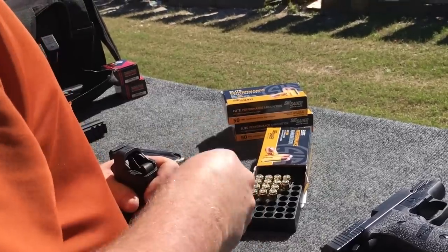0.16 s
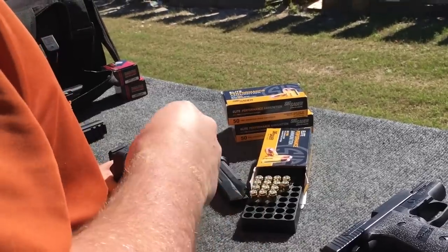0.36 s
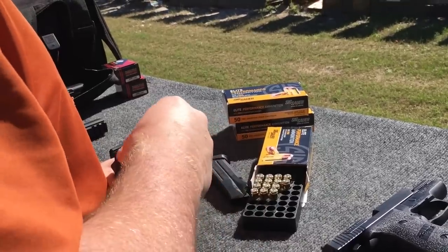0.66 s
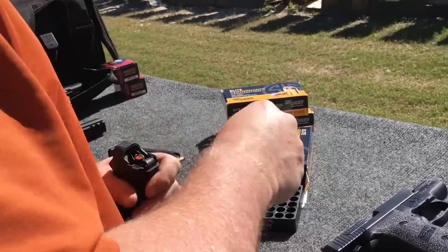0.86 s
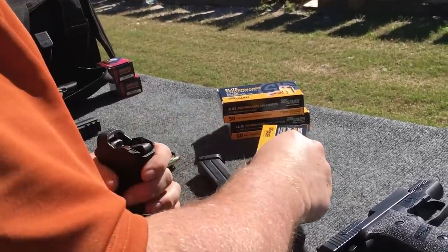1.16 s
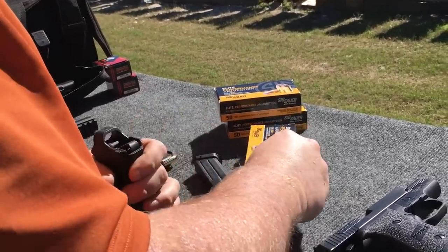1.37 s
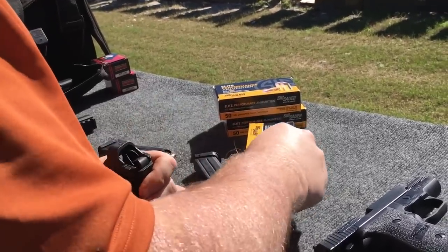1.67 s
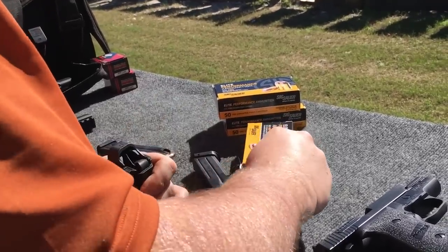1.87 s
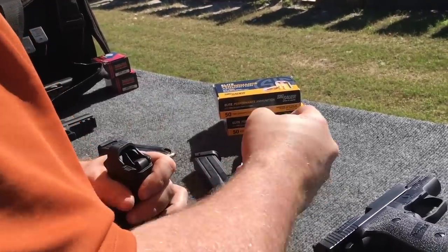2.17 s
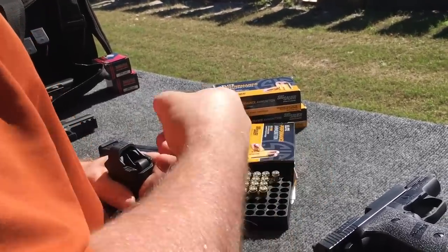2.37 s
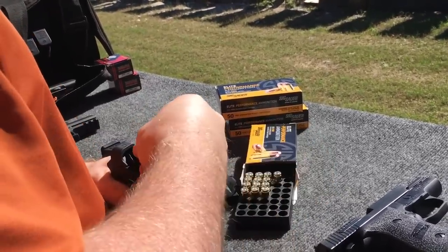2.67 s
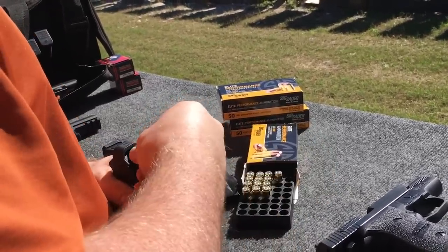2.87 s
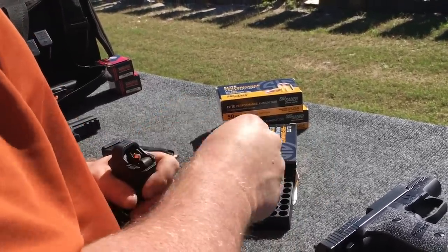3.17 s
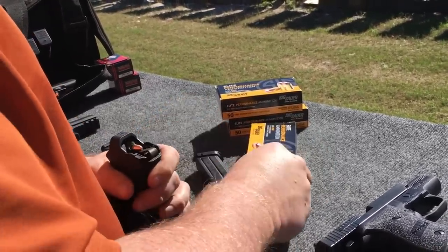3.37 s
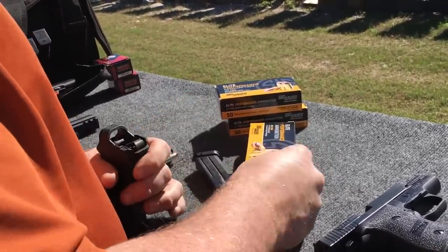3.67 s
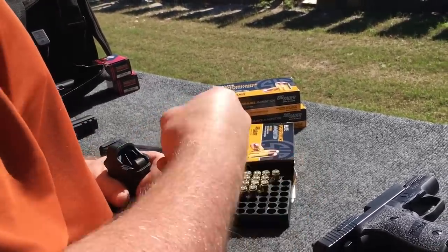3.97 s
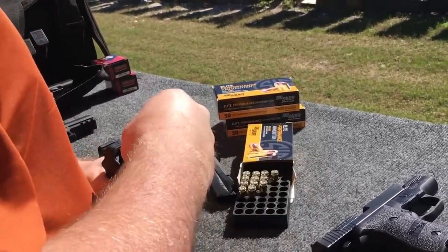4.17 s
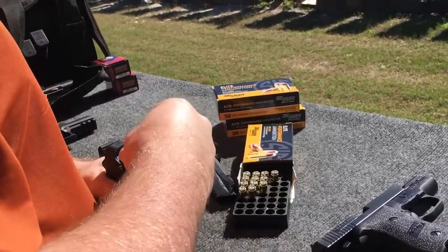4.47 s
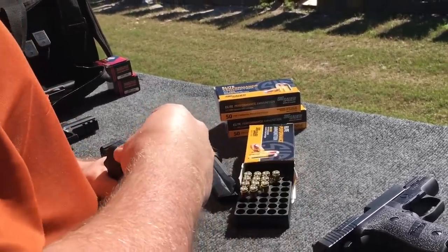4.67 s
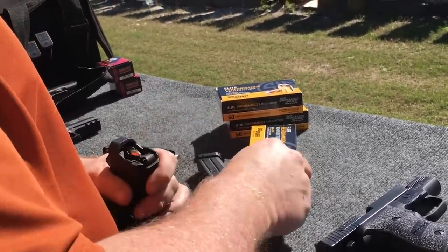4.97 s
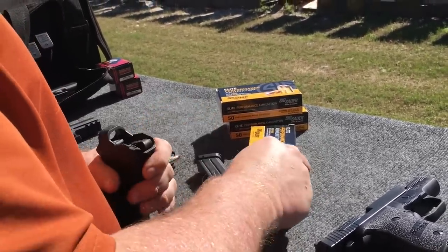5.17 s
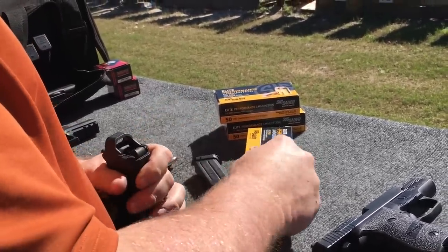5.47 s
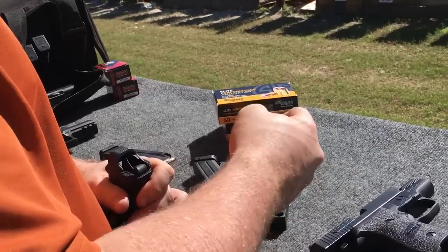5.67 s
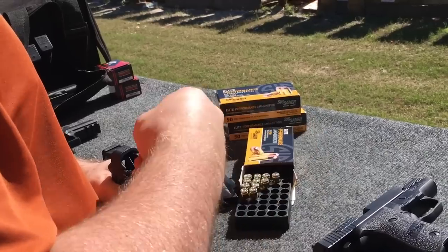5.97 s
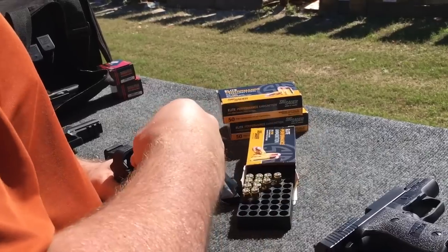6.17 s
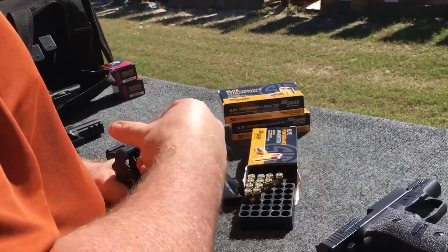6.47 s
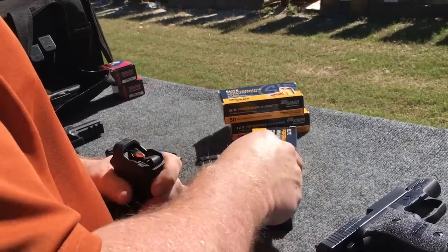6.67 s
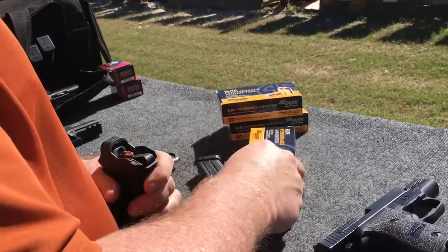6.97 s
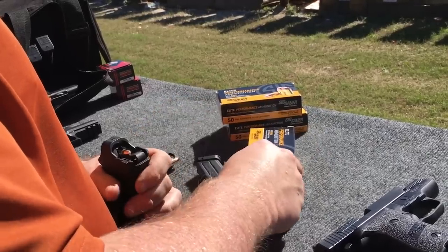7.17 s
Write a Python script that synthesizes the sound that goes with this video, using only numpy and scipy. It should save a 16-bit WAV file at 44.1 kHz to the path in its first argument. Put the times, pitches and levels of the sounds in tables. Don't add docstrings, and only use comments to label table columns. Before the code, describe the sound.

Small brass cartridges click and snap one by one into a pistol magazine through a plastic loader, close up, with wind rumbling on the microphone.

```python
import sys
import numpy as np
from scipy import signal
from scipy.io import wavfile
from scipy.ndimage import uniform_filter1d

SR = 44100
rng = np.random.default_rng(int(sys.argv[2]) if len(sys.argv) > 2 else 0)


def volts_from_decibels(level):
    exponent = np.asarray(level, float) / 20
    return 10 ** exponent


def store_pcm(level_fs):
    pcm = np.round(np.clip(level_fs, -1, 1) * 32767).astype(np.int16)
    wavfile.write(sys.argv[1], SR, np.atleast_2d(pcm).T)


N = 322812

# start in seconds [s], peak level [dB],
# bright steel against the rest [dB], pitch of the struck part [Hz].
HOLLOW_HITS = [
    (0.7679, -33.5, 5, 3670),
    (4.3608, -47.5, -8, 4150),
    (4.8469, -45, -7, 3380),
    (6.5306, -38, 11, 3700),
    (7.2905, -59, -3, 3040),
]
# start [s], peak level [dB], bright steel [dB], struck part [Hz].
STEEL_HITS = [(0.605, -33.5, 6, 4200), (0.993, -42.5, -12, 3970), (1.007, -41.5, -14, 2630),
              (1.0123, -47, 4, 8890), (1.106, -48, -38, 2540), (2.8197, -38.5, 0, 5500),
              (2.9323, -43.5, -25, 6170), (3.4829, -34.5, 10.5, 7950), (3.7997, -39, -2, 7040),
              (4.4705, -46.5, 6, 3150), (4.9704, -45, 9.5, 3930), (5.0224, -37, 5, 4560),
              (5.1056, -29, -7.5, 7500), (5.11, -51, -13, 9200), (5.391, -39, 2.5, 8750),
              (6.2398, -41, 4, 1930), (6.3148, -34.5, 12, 6260), (6.3211, -43, 16.5, 3800),
              (6.7074, -41, -0.5, 9200), (6.7167, -43.5, -4.5, 3850), (3.1439, -36, -6, 4100),
              (4.8537, -43.5, 0, 3260), (4.8595, -50, 1, 4100), (0.7817, -53, -18, 3920),
              (0.794, -48, -22, 2600), (6.5347, -47, -13, 3040), (6.8452, -40, 8.5, 7500),
              (7.2869, -34.5, -22, 4070)]
# start [s], peak level [dB], bright steel [dB], struck part [Hz].
LOADER_HITS = [(1.0274, -33.5, 17, 7700), (1.4567, -43.5, 7, 7900), (1.6835, -39, -22, 1440),
               (1.689, -44, -22, 2300), (2.1007, -50.5, -27, 1470), (2.104, -61, -30, 790),
               (2.7452, -38.5, -3, 6200), (3.082, -45, -6, 6240), (3.4302, -48, -10, 2580),
               (3.4358, -27, 6, 7800), (3.4408, -35.5, -16, 6800), (3.5187, -44, 3, 7500),
               (3.8636, -37.5, -9, 4150), (4.3542, -40.5, -14, 4160), (4.6194, -45.5, -15, 5240),
               (5.0365, -40, 6, 4800), (5.04, -26, 4.5, 7850), (5.152, -41, -5, 9000),
               (5.6753, -47.5, 9.5, 4960), (6.7445, -21.5, 7.5, 6160), (6.752, -31, -2, 9300),
               (6.8293, -40, 4, 8800)]
# plastic knock [dB], hollow tube [dB].
HOLLOW_RINGS = (-40, 8.7)
STEEL_RINGS = (-31, -12.5)
LOADER_RINGS = (-8.5, -24)
# start [s], peak level [dB], struck part [Hz], bright steel [dB].
BRASS_TICKS = [(0.659, -42.5, 3330, 10.5), (0.6988, -43.5, 5440, 6), (0.723, -47, 3430, 2),
               (0.7455, -52, 5300, 6), (0.76, -38, 5300, -9), (0.9705, -63, 5000, 0), (0.989, -51, 3840, 3),
               (1.0193, -44, 5500, 0), (1.0685, -57, 7500, 1), (1.0785, -57, 8800, 3),
               (1.482, -56, 7350, -6), (3.0896, -46.5, 6060, 7), (3.394, -46, 3730, 9),
               (3.4055, -42, 4030, 5), (3.4179, -44, 4500, 5), (3.514, -49, 7220, 8),
               (3.8174, -54, 3270, 4), (3.8886, -48.5, 9000, 7), (3.924, -49, 5500, 15),
               (4.704, -49, 5750, 13.5), (4.8065, -55, 5800, 1), (4.9663, -49, 3600, 14),
               (4.99, -53, 3800, 3), (5.005, -42.5, 4770, 6), (5.143, -42, 4920, 10),
               (5.5552, -46.5, 3530, 12.5), (5.6143, -56, 7800, -2), (5.68, -48, 5000, 3),
               (5.7194, -56, 6000, 1), (6.3554, -57, 8900, 5), (6.38, -49.5, 3920, 4),
               (6.5002, -46.5, 3890, 14), (6.5128, -40.5, 3890, -3), (6.521, -46, 2300, 3),
               (6.5446, -40.5, 3780, 3), (6.555, -52, 8500, 5), (6.7331, -45, 9500, 8),
               (6.7854, -46, 5480, 7), (6.797, -44.5, 6000, 4)]
# start [s], peak level [dB], struck part [Hz], bright steel [dB].
PLASTIC_TICKS = [(0.8067, -46, 3640, -12), (1.222, -59.5, 4440, -26), (1.259, -56, 4000, -23),
                 (1.2988, -47, 2400, -9), (1.3738, -45, 2400, -12), (1.404, -40.5, 2380, -10),
                 (1.4994, -48, 2300, -32), (1.567, -51.5, 2290, -38), (1.6176, -55, 5030, -12),
                 (1.725, -42, 2650, -12), (1.792, -50.5, 5600, -33), (2.046, -55, 3500, -27),
                 (2.0846, -51, 2600, -38), (2.9743, -43, 5540, -13), (3.042, -56, 5200, -18),
                 (3.1527, -41.5, 3900, -15), (3.325, -63, 3800, -17), (3.377, -51, 4300, -21),
                 (3.5, -44, 2510, -21), (3.6431, -54, 2360, -16), (3.742, -48.5, 2320, -21),
                 (3.9592, -49, 4480, -16), (4.363, -44, 3550, -19), (4.492, -60, 2600, -14),
                 (4.5715, -60, 3700, -18), (4.589, -60, 3700, -25), (4.7243, -45, 2730, -4),
                 (4.7635, -57, 2610, -14), (4.7756, -57, 3500, -14), (4.867, -42.5, 3680, -1),
                 (5.212, -46, 2420, -6), (5.2536, -47.5, 2250, 0), (5.315, -68, 2200, -14),
                 (5.5822, -43, 3240, -30), (5.643, -48, 2260, -8), (5.6667, -40, 2620, -28),
                 (5.747, -55, 2350, -16), (6.289, -42, 2120, -20), (6.297, -51, 5100, -10),
                 (6.461, -58, 5300, -20), (7.024, -52, 2370, -15)]
# start [s], peak level [dB], struck part [Hz].
SLIPS = [
    (0.7055, -54, 5300),
    (0.7185, -61, 9500),
    (0.732, -64, 8800),
    (3.4025, -50, 3900),
    (3.427, -52, 4000),
    (3.431, -44, 12300),
    (3.521, -53, 5000),
    (5.017, -54, 4200),
    (6.738, -44, 8500),
    (6.741, -37, 9000),
]
# start [s], peak level [dB], pitch [Hz], time to fall 60 dB [s].
OVERTONES = [(0.606, -47, 8600, 0.013), (0.768, -41, 3330, 0.054), (0.769, -42, 9900, 0.018),
             (0.989, -50, 5500, .012), (0.989, -52, 3800, .025), (1.007, -41, 4300, .012),
             (1.028, -35, 3950, 0.017), (1.027, -36, 2400, 0.026), (1.0274, -45, 11200, .01),
             (1.1065, -46, 4860, 0.011), (1.686, -41, 2050, .02), (2.071, -58, 2100, .02),
             (2.087, -51, 850, .03), (2.1007, -39.5, 940, 0.048), (2.114, -54, 950, .025),
             (3.4365, -36, 1110, 0.013), (3.4415, -40, 8600, .012), (3.4415, -48, 3800, .015),
             (4.362, -45, 1700, 0.028), (4.62, -49, 3500, 0.045), (4.624, -51.5, 2580, 0.037),
             (4.704, -62, 2600, .03), (4.858, -50, 2260, 0.043), (4.86, -48, 3350, 0.041),
             (5.04, -35, 1060, .015), (5.0405, -39, 10300, .01), (5.106, -54, 4330, 0.012),
             (6.246, -50, 2400, 0.034), (6.288, -55, 3700, 0.062), (6.295, -59, 5150, .03),
             (6.5008, -48, 2330, 0.029), (6.535, -47, 3400, 0.076), (6.744, -29, 10000, 0.011),
             (6.7445, -33, 2060, .015), (6.744, -34.5, 8200, .01), (7.287, -36, 4470, 0.013),
             (7.2855, -38.5, 2600, 0.028), (7.2866, -39, 7140, .012)]
# pitch [Hz], width [Hz], level [dB].
STEEL_MODES = [(2520, 36, 11.5), (4105, 560, 16), (4800, 95, 0), (5860, 340, 15), (6500, 480, -3),
               (7330, 310, -1.5), (8800, 220, -1.5), (9820, 410, 2), (11640, 1800, -17.5),
               (13900, 500, -36)]
# pitch [Hz], width [Hz], level [dB].
PLASTIC_MODES = [(1210, 166, 3), (1730, 1230, -2.5), (1980, 210, -4)]
# pitch [Hz], width [Hz], level [dB].
TUBE_MODES = [(3520, 130, 0), (3390, 90, -3), (3750, 220, -5)]
# start [s], end [s], level [dB], singing part [Hz].
SCRAPES = [(0.174, 0.196, -78.5, 5000), (0.706, 0.777, -76, 5300), (1.263, 1.359, -72.5, 12300),
           (1.392, 1.44, -75, 5500), (1.445, 1.509, -65, 8400), (1.525, 1.63, -79, 5000),
           (1.679, 1.752, -69, 12100), (1.772, 1.827, -79, 5540), (1.844, 1.9, -78.5, 5500),
           (3.395, 3.443, -70, 3830), (3.582, 3.652, -77.5, 2380), (3.644, 3.713, -76.5, 9100),
           (3.727, 3.806, -75.5, 5640), (3.794, 3.917, -73, 6000), (3.936, 3.958, -69, 8900),
           (4.027, 4.045, -73, 8150), (5.18, 5.245, -80.5, 5000), (5.247, 5.306, -73.5, 8500),
           (5.32, 5.403, -75, 5530), (5.643, 5.705, -69.5, 11500), (5.659, 5.677, -63.5, 5000),
           (6.722, 6.746, -58.5, 4000), (7.253, 7.33, -71.5, 2600)]
# start [s], end [s], level [dB], singing part [Hz].
RUBS = [(0.617, 0.673, -78, 3500), (0.781, 0.803, -64.5, 3500), (0.992, 1.033, -61, 4800),
        (1.033, 1.092, -71.5, 4500), (2.056, 2.17, -84, 3470), (2.82, 2.865, -80, 5300),
        (2.982, 3.028, -87, 5200), (3.158, 3.197, -83, 3900), (3.441, 3.53, -72, 7000),
        (4.465, 4.507, -80, 5000), (4.615, 4.628, -70, 3100), (4.64, 4.687, -85, 5300),
        (4.88, 4.95, -86, 3600), (4.705, 4.775, -73, 3050), (4.803, 4.838, -78, 5800),
        (4.965, 5.16, -73.5, 4000), (5.543, 5.632, -86, 3500), (6.243, 6.3, -75.5, 3700),
        (6.327, 6.39, -74, 6000), (6.44, 6.49, -80, 3700), (6.508, 6.557, -69, 3500),
        (6.565, 6.6, -80, 3600), (6.762, 6.854, -70, 4200), (6.863, 7.001, -81.5, 2350)]
# frequency [Hz], density [dB per Hz].
RUB_SPECTRUM = [(900, -15), (1600, 11), (2400, 5.5), (4500, 7), (7000, -2.5), (12000, -13.5), (15500, -11)]
# time [s], level [dB].
BREEZE = [(0.0, -55), (0.96, -52.5), (1.1, -46), (2.18, -45), (2.36, -43), (2.93, -50.5), (3.55, -37.5),
          (4.03, -44.5), (4.5, -45.5), (4.78, -44), (4.93, -40.5), (5.18, -37), (5.44, -38.5),
          (5.75, -39.5), (6.12, -38), (6.4, -37.5), (6.91, -37), (7.32, -41)]
# frequency [Hz], density [dB per Hz].
BUFFET_SPECTRUM = [(18, -46.5), (30, -17), (49, -7), (80, 5.5), (149, -0.5), (210, -3), (330, -37.5),
                   (430, -43), (730, -120)]
# crest [s], peak level [dB], pitch [Hz].
EDDIES = [(0.533, -31.5, 111), (0.922, -24, 138), (1.305, -34, 78), (1.658, -30, 139), (2.225, -26.5, 104),
          (2.304, -27, 116), (2.915, -25.5, 132.5), (3.003, -26, 143), (3.237, -29, 111),
          (3.404, -25.5, 132), (3.464, -27, 138), (3.56, -21, 178), (3.678, -28.5, 147),
          (3.983, -23.5, 126), (4.059, -27.5, 174), (4.229, -27, 94), (4.391, -24.5, 141),
          (4.632, -28, 91.6), (5.105, -29.5, 175), (5.266, -24, 122), (5.348, -24, 164), (5.429, -28, 169),
          (5.766, -27.5, 133), (5.901, -25, 154), (6.104, -25, 122), (6.291, -27, 119), (6.809, -27.5, 164),
          (6.899, -26, 170), (6.935, -27.5, 120), (7.13, -27.5, 136),
          (0.298, -39, 116), (0.89, -39, 101), (0.989, -28.5, 111), (1.156, -37.5, 182),
                (1.375, -41, 105), (1.429, -36, 105), (1.726, -38, 129), (1.788, -38, 80), (1.898, -37, 80),
                (2.278, -27, 103), (2.331, -34, 186), (2.628, -32, 112), (2.8, -32, 82.5),
                (3.342, -41, 78.6), (3.731, -27, 139), (3.899, -31, 122), (4.112, -26, 109.3),
                (4.365, -38, 82.5), (4.91, -35.5, 98), (4.981, -27.5, 125), (5.134, -32.5, 111),
                (5.175, -36, 102), (5.586, -28.5, 140), (5.661, -29, 83), (5.79, -29, 195),
                (5.958, -30.5, 97), (6.496, -29.5, 129), (6.838, -27, 149), (2.042, -33.5, 100),
                (3.102, -24.5, 138), (3.154, -23.5, 119), (2.014, -39, 120), (4.371, -33, 147),
                (4.48, -31, 108), (4.891, -38.5, 120), (5.972, -28, 116.5), (7.011, -28, 152.6),
                (7.257, -24.5, 165)]
# start [s], pop peak [dB], eddy peak [dB], eddy pitch [Hz].
BREAKS = [(2.022, -46, -27.5, 260), (2.55, -42.5, -25, 168), (3.087, -30.5, -18.5, 187),
          (3.139, -47, -29.5, 150), (3.843, -72, -21, 193), (4.021, -40.5, -21, 135),
          (5.516, -41, -24, 210), (6.145, -46, -24.5, 209), (6.193, -47.5, -29, 134),
          (6.738, -48, -29.5, 110), (6.992, -56, -23.5, 174), (7.176, -42.5, -35.5, 149),
          (7.238, -44.5, -27, 177), (3.162, -40, -31, 140), (1.377, -54, -37.5, 201),
          (1.439, -62, -37, 212), (1.653, -46, -42, 200), (1.725, -55, -34, 210)]
# crest [s], peak level [dB], half width [s].
NIPS = [
    (2.0272, -32, 0.00036),
    (6.995, -38, 0.00057),
]
# frequency [Hz], density [dB per Hz].
ROAD_SPECTRUM = [(24, -33), (40, -2), (75, 6.5), (143, 3), (247, -27), (294, -15), (461, -23), (797, -12),
                 (1050, -22.5), (1330, -22), (1730, -43.5), (2270, -41.5), (11200, -54.5), (15500, -62.5)]


def clicks():
    s, peak_db, ring_hz, bright_db = columns(BRASS_TICKS + PLASTIC_TICKS)
    knock_db = -7.0 - 0.28 * bright_db
    out = contacts(s, peak_db - 6.0, knock_db, -11.0, bright_db, ring_hz, t60=0.085)
    kinds = (HOLLOW_HITS, HOLLOW_RINGS), (STEEL_HITS, STEEL_RINGS), (LOADER_HITS, LOADER_RINGS)
    for hits, (knock_db, tube_db) in kinds:
        s, peak_db, bright_db, ring_hz = columns(hits)
        out += contacts(s, peak_db, knock_db, tube_db, bright_db, ring_hz, t60=0.028)
    return out


def contacts(s, peak_db, knock_db, tube_db, bright_db, ring_hz, t60):
    t = np.arange(7000) / SR
    chatter = np.exp(-(t / 0.0013) ** 2)
    rattle = volts_from_decibels(-11.5 - 60 * t / t60)
    noise = rng.standard_normal((len(s), len(t)))
    grit = volts_from_decibels(17 * uniform_filter1d(rng.standard_normal(noise.shape), size=25, axis=1))
    dull = signal.lfilter([.6], [1, -.6], noise)
    attack = np.minimum(t / 0.00049, 1)
    hits = (noise * chatter + dull * rattle * grit) * attack
    lingering = hits + volts_from_decibels(-31 - 60 * t / 0.23) * dull

    crack = filtered(hits, 1, [2200, 9000], "band")
    steel = volts_from_decibels(-4) * body(hits, STEEL_MODES) + peak_one(crack)
    top = filtered(steel, 2, 7000, "high")
    dying_top = filtered(top, 1, 11500, "low") * volts_from_decibels(-60 * t / 0.078)
    steel = volts_from_decibels(-2.5) * (steel - dying_top) + volts_from_decibels(bright_db - 2.0) * dying_top

    struck = [resonance(hit, hz, 0.12 * hz) for hit, hz in zip(lingering, ring_hz[:, 0])]
    struck = peak_one(np.array(struck))
    knock = volts_from_decibels(knock_db + 1.5) * body(hits, PLASTIC_MODES)
    tube = volts_from_decibels(tube_db - 8.5) * body(lingering, TUBE_MODES)
    return lay(s[:, 0], volts_from_decibels(peak_db + 3.0) * (steel + volts_from_decibels(-4.5) * struck + knock + tube))


def body(hits, modes):
    luck_db = 4 * rng.standard_normal((len(hits), len(modes)))
    rung = 0
    for k, (hz, width_hz, db) in enumerate(modes):
        strength = (-1) ** k * volts_from_decibels(db + luck_db[:, [k]])
        rung = rung + strength * resonance(hits, hz, width_hz)
    return peak_one(rung)


def overtones():
    t = np.arange(5000) / SR
    s, peak_db, hz, t60 = columns(OVERTONES)
    push = np.exp(-(t / 0.0007) ** 2) + volts_from_decibels(-8 - 60 * t / (1.6 * t60))
    scuffs = rng.standard_normal(push.shape) * push + 1e-18
    width_hz = 3.0 * np.log(1000) / np.pi / t60
    rung = np.array([resonance(*part) for part in zip(scuffs, hz[:, 0], width_hz[:, 0])])
    ringing = lay(s[:, 0], volts_from_decibels(peak_db) * peak_one(rung))
    s, peak_db, ring_hz = columns(SLIPS)
    return ringing + contacts(s, peak_db, -27.0, -24.0, 6.0, ring_hz, t60=0.015)


def slide():
    grains_per_s = 1600 * volts_from_decibels(3.0 * drift(25))
    grains = uneven_sizes(3.5, 5) * (rng.random((2, N)) < grains_per_s / SR)
    grains = grains + 0.31 * rng.standard_normal((2, N))
    rub = banded(grains, RUB_SPECTRUM, patchy_db=1.2, rate=15) * volts_from_decibels(2.3 * drift(40))
    top = filtered(rub, 2, 7000, "high")
    rub += volts_from_decibels(4) * resonance(rub, 2390, 350)
    rub += volts_from_decibels(-21.5) * resonance(rub, 5300, 400)
    t, out = np.arange(N) / SR, np.zeros(N)
    for rows, bright_db in ((SCRAPES, 6), (RUBS, -12)):
        for start, end, level_db, sing_hz in rows:
            now = slice(int((start - .01) * SR), int((end + .03) * SR))
            stroke = np.interp(t[now], [start - .01, start + .005, end, end + .03], [0, 1, 1, 0]) ** 2
            singing = rms_one(resonance(rub[now], sing_hz, 0.16 * sing_hz))
            out[now] += volts_from_decibels(level_db) * stroke * (rub[now] - top[now] + volts_from_decibels(bright_db) * top[now])
            out[now] += volts_from_decibels(level_db - 15.5) * stroke * singing
    return out


def wind():
    after_pop_s = 0.00832
    breaking = [(s + after_pop_s, db, hz) for s, _, db, hz in BREAKS]
    s, peak_db, pitch_hz = columns(EDDIES + breaking)

    around = (np.arange(13230) / SR - .15) / 0.04
    gust_db = peak_db - 19 - 5 * np.log2(pitch_hz / 130)
    gusts = lay(s[:, 0] - .15, volts_from_decibels(gust_db) * np.exp(-around ** 2))
    breeze_s, breeze_db = np.transpose(BREEZE)
    strength = volts_from_decibels(np.interp(np.arange(N) / SR, breeze_s, breeze_db)) + gusts

    bursts_per_s = np.array([[220], [90]])
    deep, quick = uneven_sizes(4.0, 4) * (rng.random((2, N)) < bursts_per_s / SR)
    deep = rms_one(deep) + 0.45 * rng.standard_normal(N)
    steady = banded([deep, deep], BUFFET_SPECTRUM, patchy_db=5.5, rate=19.9)
    steady = filtered(2.6 * np.tanh(steady / 2.6), 4, 480, "low")
    flutter = rms_one(filtered(rms_one(quick) + deep, 4, [180, 370], "band"))
    flutter = volts_from_decibels(-64.5) * (100 * strength) ** 3.4 * flutter

    cycles = (np.arange(4400) / SR - .03) * pitch_hz
    swell = np.exp(-(cycles / np.where(cycles < 0, .7, 1.2)) ** 2)
    phase = 2 * np.pi * (cycles - 0.47 * cycles ** 2 + rng.random(s.shape))
    swing = np.cos(phase) + 0.2 * swell ** 2 * np.cos(2.224 * phase)
    eddies = lay(s[:, 0] - .03, volts_from_decibels(peak_db + 1.5) * swell * swing)
    return strength * steady + flutter + eddies


def pops():
    s, peak_db, _, _ = columns(BREAKS)
    t = np.arange(2000) / SR
    pitch_hz = 300 + 380 * np.exp(-((t - 0.0025) / 0.00193) ** 2)
    pitch_hz = pitch_hz * rng.uniform(0.842, 1.185, s.shape)
    swell = t / 0.0086 * np.exp(1 - t / 0.0045)
    phase = 2 * np.pi * (np.cumsum(pitch_hz, axis=1) / SR + rng.random(s.shape))
    swing = np.sin(phase) + 0.11 * np.exp(-t / 0.0036) * np.sin(2.5 * phase)
    return lay(s[:, 0], volts_from_decibels(peak_db + 6.5) * swell * swing)


def nips():
    s, peak_db, half_s = columns(NIPS)
    u = (np.arange(440) / SR - .005) / half_s
    return lay(s[:, 0] - .005, volts_from_decibels(peak_db) * (1 - u ** 2) * np.exp(-u ** 2 / 2))


def road():
    return volts_from_decibels(-49.5) * banded(rng.standard_normal((2, N)), ROAD_SPECTRUM, patchy_db=-1.2, rate=1.8)


def columns(rows):
    return np.transpose(rows)[:, :, None]


def rms_one(x):
    return x / np.sqrt(np.mean(x ** 2) + 1e-20)


def peak_one(x):
    return x / np.abs(x).max(axis=1, keepdims=True)


def filtered(x, order, hz, kind):
    return signal.sosfilt(signal.butter(order, hz, kind, fs=SR, output="sos"), x)


def resonance(x, hz, width_hz):
    r = np.exp(-np.pi * width_hz / SR)
    push = np.array([1, 0, -1]) * (1 - r * r) / 2
    return signal.lfilter(push, [1, -2 * r * np.cos(2 * np.pi * hz / SR), r * r], x)


def uneven_sizes(spread_db, most):
    size_db = spread_db * np.minimum(rng.exponential(1, (2, N)), most)
    return volts_from_decibels(size_db) * rng.choice([-1, 1], (2, N))


def drift(rate):
    r = np.exp(-80 * np.pi * rate / SR)
    slow = signal.lfilter([1], [1, -2 * r, r * r], rng.standard_normal(N // 40 + 2002))[2000:]
    return np.interp(np.arange(N) / 40, np.arange(len(slow)), rms_one(slow))


def banded(source, spectrum, patchy_db, rate):
    hz, db = np.transpose(spectrum)
    edges = np.geomspace(18, 17000, 31)
    out = 0
    for k, (low, high) in enumerate(zip(edges, edges[1:])):
        level_db = np.interp(np.log(low * high) / 2, np.log(hz), db, left=-80, right=-80)
        if level_db > -79:
            band = filtered(source[k % 2], 2, [low, high], "band")
            out = out + volts_from_decibels(level_db + patchy_db * drift(rate)) * band
    return rms_one(out)


def lay(times, pieces):
    out = np.zeros(N + pieces.shape[1])
    for s, piece in zip(times, pieces):
        out[int(s * SR):int(s * SR) + len(piece)] += piece
    return out[:N]


def scene():
    hands = clicks() + slide() + overtones()
    air = wind() + pops() + nips() + road()
    late = np.concatenate([np.zeros(int(0.0067 * SR)), hands])[:N]
    echo = signal.lfilter([.4], [1, -.6], late)
    return (hands + volts_from_decibels(-12.5) * echo + air)[None]


def roll_off(x):
    return signal.sosfilt(signal.butter(12, 16820, fs=SR, output="sos"), x)


def record(dry):
    limit = .26
    x = filtered(dry, 4, 52.8, "high")
    x = limit * np.tanh(x / limit)
    x = signal.sosfilt(signal.cheby2(20, 52, 16800, fs=SR, output="sos"), x)
    return roll_off(x)


dry = scene()
out = record(dry)
store_pcm(out)
```